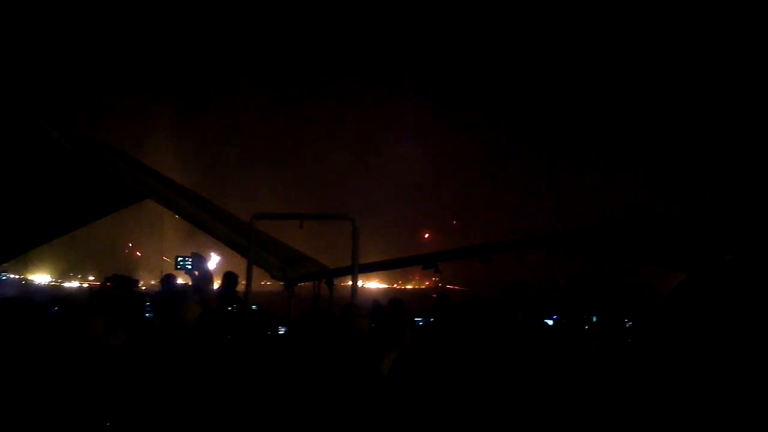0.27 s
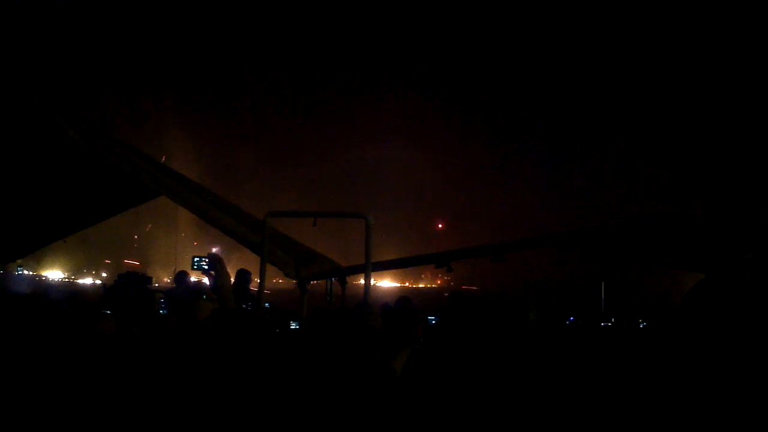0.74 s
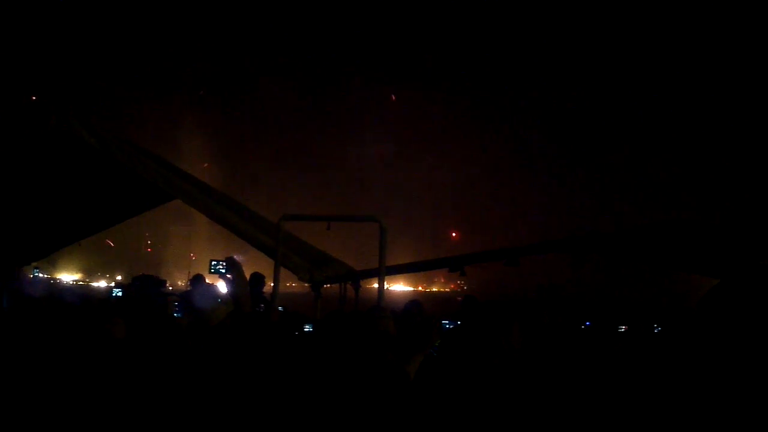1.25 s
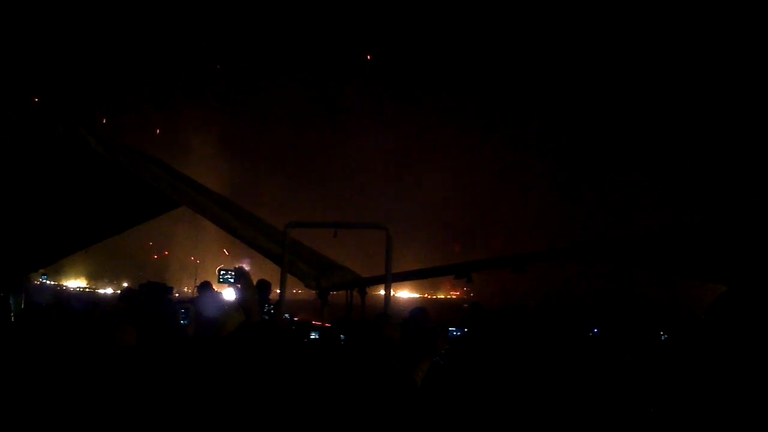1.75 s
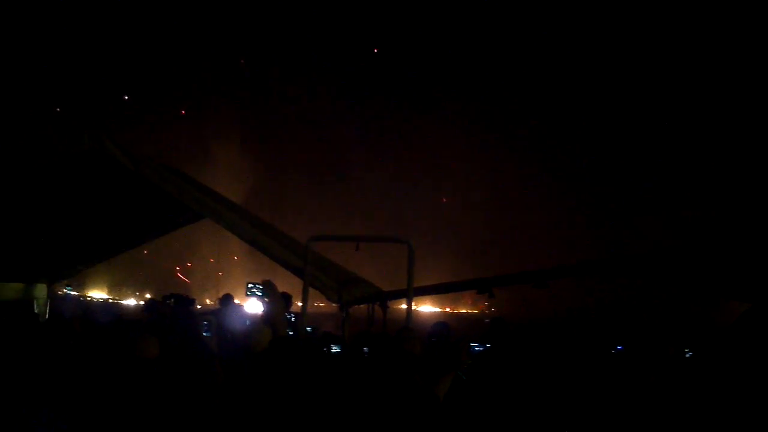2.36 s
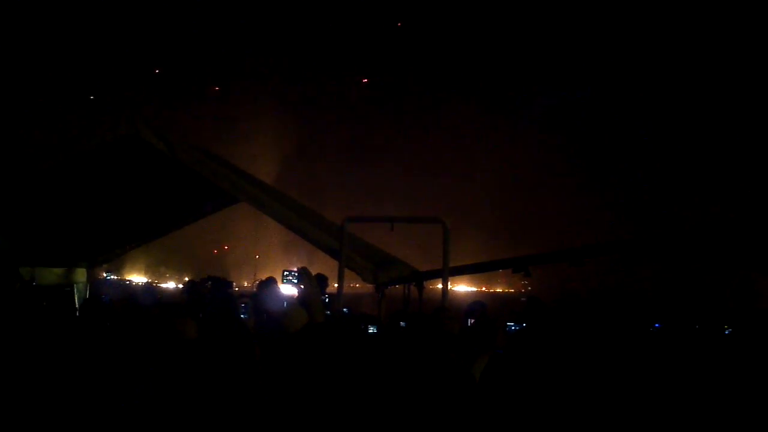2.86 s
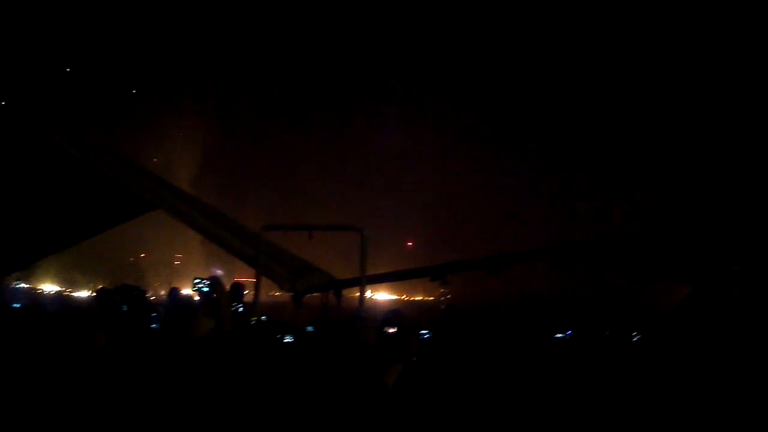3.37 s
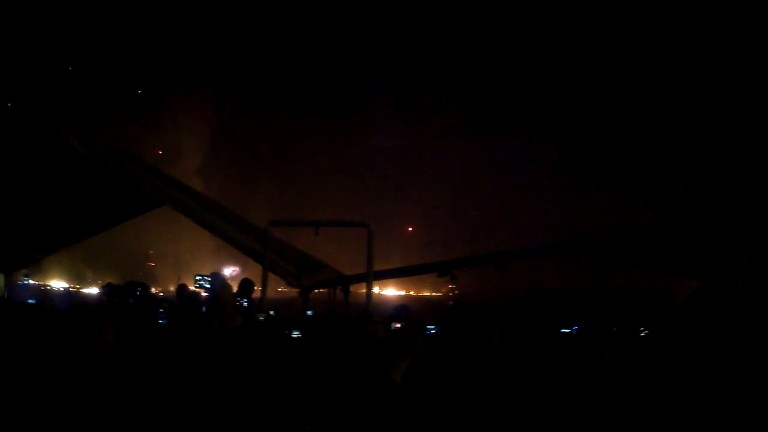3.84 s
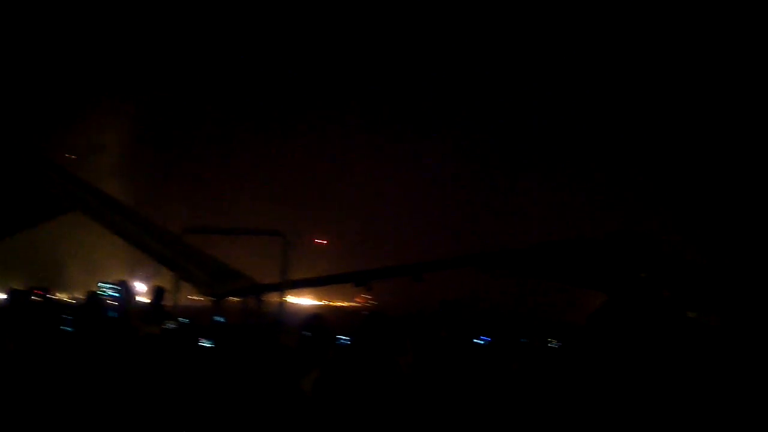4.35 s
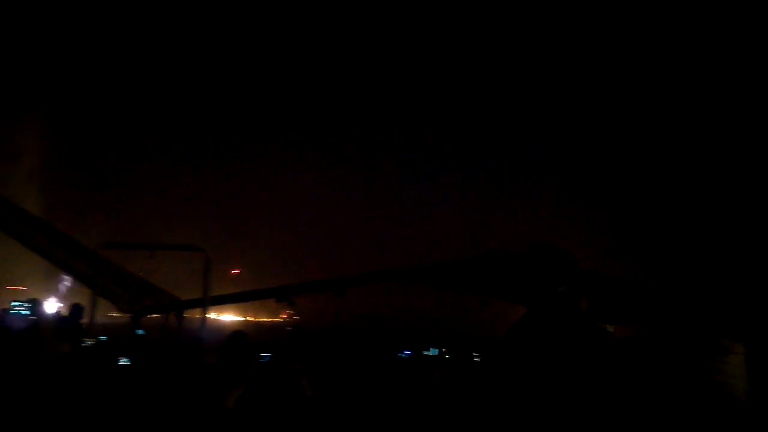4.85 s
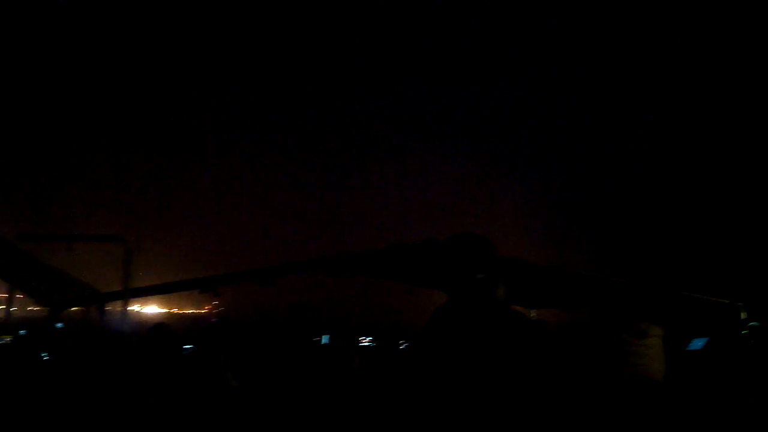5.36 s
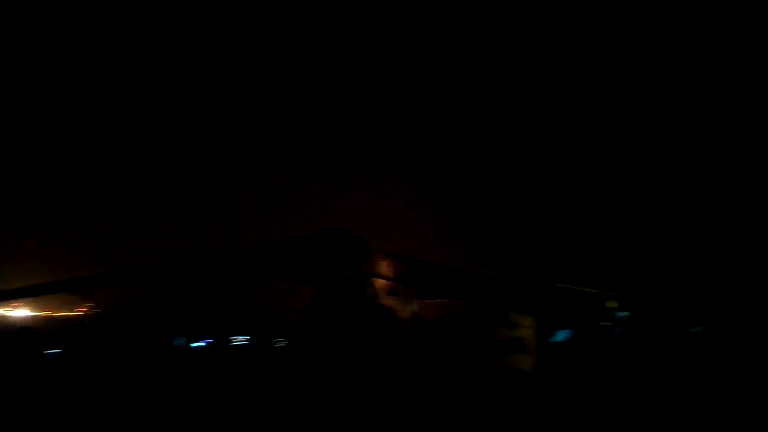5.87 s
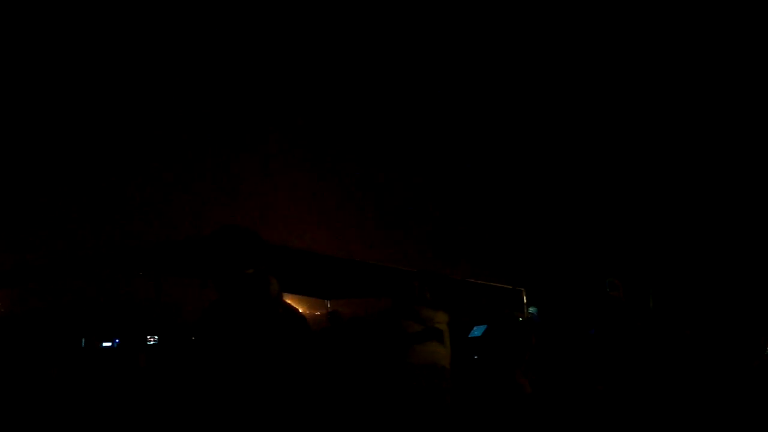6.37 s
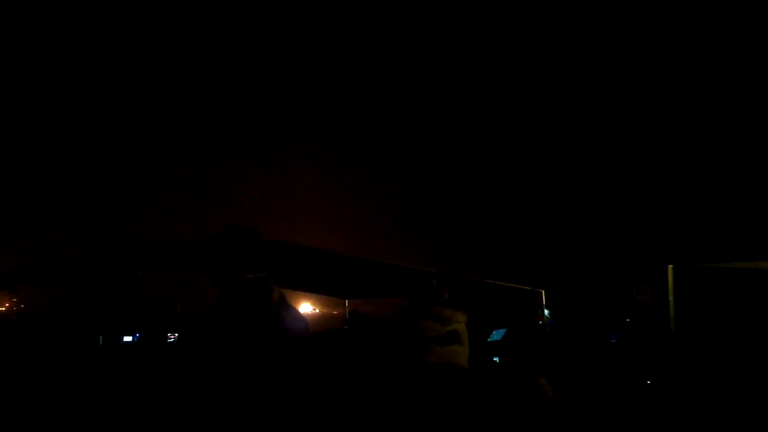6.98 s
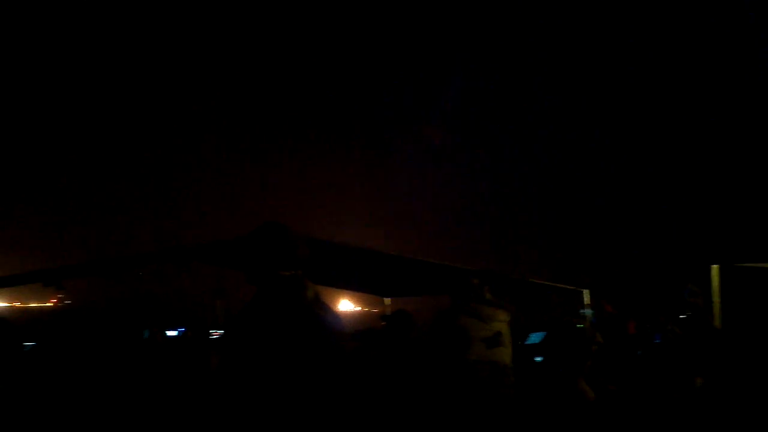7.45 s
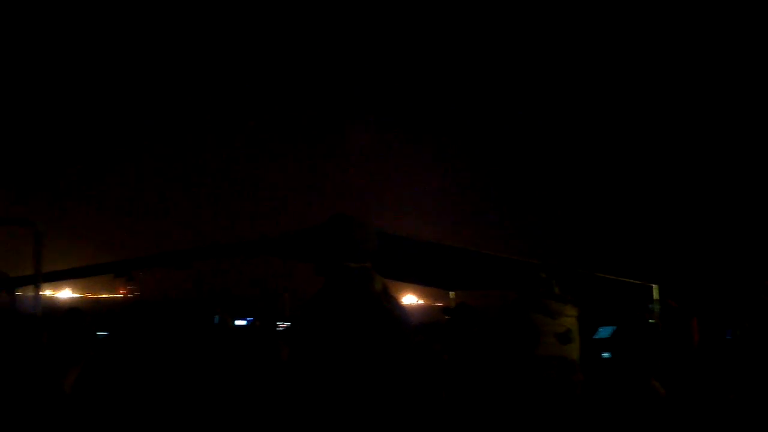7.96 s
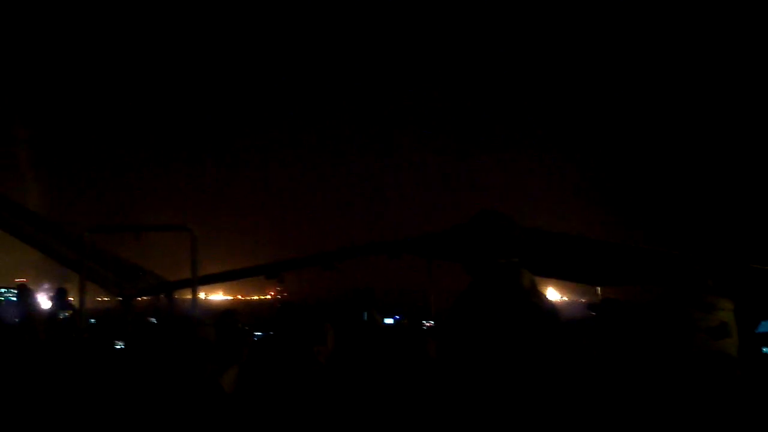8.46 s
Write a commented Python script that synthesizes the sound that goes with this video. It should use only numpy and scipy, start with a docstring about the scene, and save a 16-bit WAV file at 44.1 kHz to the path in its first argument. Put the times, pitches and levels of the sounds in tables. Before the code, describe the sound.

A near machine gun hammers about ten rounds a second without pause over a dense night firing line of slower guns, short bursts and distant rolling fire.

```python
"""A near machine gun hammers ten rounds a second over a slower gun that soon stops and short bursts along the
line. Heavy thumps come mostly from downrange, far guns blur into a roll, and a faint whine swells near the
third second. Guns are shaped pulses at listed times, with echoes, ringing structures and decaying scattered
noise. Thumps are falling sine swings; the whine is a wavering sine. A small stereo microphone widens and limits
the sum."""
import sys
import numpy as np
from scipy import signal
from scipy.fft import rfft, irfft
from scipy.io import wavfile
from scipy.ndimage import uniform_filter1d, minimum_filter1d

SR = 44100
rng = np.random.default_rng(int(sys.argv[2]) if len(sys.argv) > 2 else 0)


def file_out(sig):
    """Save sig as 16-bit WAV at sys.argv[1]."""
    # one column per channel
    cols = np.atleast_2d(sig).T
    # limit, then scale
    lim = np.clip(cols, -1, 1)
    pcm = np.round(lim * 32767).astype(np.int16)
    wavfile.write(sys.argv[1], SR, pcm)


N = 384552
TIME_S = np.arange(N) / SR
FREQS_HZ = np.fft.rfftfreq(N, 1 / SR)

# All dB levels below are relative, ahead of the mix gains.
# Far line firing. Each row: time in seconds, roll level in dB, treble level in dB.
FAR_LINE = [(0.0, -23, -45), (0.82, -23, -31), (1.7, -24, -30.5), (3.79, -27, -31.5), (4.01, -27, -40),
            (5.39, -26, -33.5), (6.63, -24.5, -32.5), (6.9, -20.5, -27.5), (7.43, -25.5, -34),
            (8.04, -25, -30), (8.43, -28, -38), (8.72, -25, -37)]
# Far line's midrange clatter. Each row: time in seconds, level in dB.
FAR_CLATTER_LEVEL = [(0.0, -28), (1.0, -33.5), (2.6, -29), (3.3, -32.5), (4.1, -34), (4.7, -42), (6.5, -48),
                     (6.95, -36), (7.3, -50), (8.72, -53)]
# Faint hoarse whine. Each row: time in seconds, centre in Hz, level in dB.
WHINE = [(2.3, 415, -50), (2.55, 400, -31.5), (2.72, 400, -32), (2.82, 423, -35), (3.15, 446, -34),
         (3.35, 447, -53)]
# Dull low reports, mostly from downrange; the low chirps near 5.27 s and 6.96 s come with near-gun rounds. #
# Each row: start in seconds, level in dB, starting pitch in Hz, final pitch in Hz, # length in seconds, left
# minus right in dB.
THUMPS = [(0.012, -17, 707, 655, 0.019, 5), (0.218, -18, 710, 653, 0.02, 0),
          (0.728, -20, 720, 660, 0.02, 1), (0.853, -13, 229, 114, 0.019, 4),
          (0.881, -19, 170, 130, 0.023, 2), (5.2415, -15.5, 307, 101, 0.017, 15),
          (5.272, -22, 238, 100, 0.018, 1), (6.705, -18, 282, 230, .02, 6), (6.84, -19, 260, 200, .02, 8),
          (6.958, -12.5, 292, 110, 0.017, 10), (6.975, -17, 300, 240, 0.017, 7),
          (7.709, -12.5, 290, 184, 0.017, -6), (7.817, -12, 287, 185, 0.017, -6),
          (7.931, -13.5, 280, 182, 0.017, -3)]
# Other guns on the line. Each row: time in seconds, midrange bark in dB, knock in Hz, treble crack in dB.
LINE_SHOTS = [(0.0, -21, 786, -22), (0.074, -18, 470, -20.5), (0.105, -17, 1210, -23.0),
              (0.188, -15.5, 470, -20.5), (0.25, -21, 1420, -31.0), (0.27, -18, 1160, -28.0),
              (0.298, -20, 1680, -23.0), (0.348, -15.5, 1030, -26), (0.407, -22, 650, -37),
              (0.433, -19, 1160, -30), (0.525, -23, 1080, -31), (0.61, -12.5, 600, -24),
              (0.681, -37, 990, -27), (0.698, -15.5, 520, -29.0), (0.727, -27, 1120, -26),
              (0.779, -16, 520, -26.0), (0.848, -17, 470, -39), (0.902, -22, 470, -25),
              (0.997, -21, 1160, -23.0), (1.089, -23, 780, -25.0), (1.181, -20, 1590, -25),
              (1.275, -23, 690, -30), (1.283, -33, 990, -35), (1.364, -23, 1380, -24.5),
              (1.478, -17.5, 1120, -23.5), (1.549, -21, 1080, -25.5), (1.576, -19, 1080, -29),
              (1.64, -21, 1340, -26.0), (1.674, -22, 990, -30), (1.828, -18, 950, -33),
              (1.918, -23, 1510, -24), (2.172, -22, 1080, -32.0), (2.268, -24, 1120, -28),
              (2.363, -22, 1080, -33), (2.38, -20, 1460, -26), (2.471, -18.5, 520, -30),
              (2.489, -28, 690, -31.0), (2.522, -22, 1210, -28), (2.537, -21, 470, -38),
              (2.566, -19, 1420, -29), (2.68, -28, 950, -28), (2.998, -24, 820, -38),
              (3.204, -21, 470, -22.5), (3.301, -25, 470, -21.5), (3.474, -18.5, 1175, -27.0),
              (3.559, -21, 1200, -30), (3.577, -23, 1080, -32), (3.675, -19.5, 1120, -35.0),
              (4.033, -20.5, 1080, -25.5), (4.056, -22, 470, -36), (4.129, -21, 1110, -26),
              (4.225, -19, 470, -27.0), (4.544, -21.5, 1410, -24.5), (4.639, -21, 1410, -25.5),
              (4.734, -18.5, 1400, -28.0), (4.827, -20, 1420, -27.5), (4.84, -16.5, 560, -36),
              (4.92, -19.5, 1380, -27), (5.241, -22, 600, -43), (5.261, -17, 1210, -29.0),
              (5.36, -19, 1160, -29), (5.467, -17.5, 1160, -29), (5.56, -16, 1080, -28.5),
              (5.653, -17.5, 1340, -28.5), (5.992, -18.5, 860, -23), (6.064, -17, 1370, -29),
              (6.1, -14, 820, -20.0), (6.167, -14, 1180, -30), (6.265, -14.5, 1170, -28),
              (6.359, -15.5, 1180, -30), (6.565, -18.5, 1980, -29), (6.704, -21, 950, -26),
              (6.742, -24, 900, -28.0), (6.764, -15.5, 1120, -32), (6.847, -23, 860, -25),
              (6.872, -14.5, 1140, -29), (6.942, -32, 690, -26), (6.965, -18, 1200, -30),
              (7.042, -29, 690, -29), (7.061, -16, 1160, -23.5), (7.142, -45, 470, -27),
              (7.477, -17.5, 1250, -29), (7.581, -16, 1220, -30.0), (7.679, -14, 1200, -32),
              (8.063, -15, 1170, -32), (8.163, -15.5, 1160, -23), (8.268, -18, 1120, -42),
              (8.36, -17.5, 1030, -30), (8.465, -15, 1210, -38), (8.645, -15, 830, -18.5)]
# Slow gun, evenly spaced between listed rounds. Each row: time in seconds, midrange bark in dB,
# treble crack in dB, knock in Hz.
SLOW_GUN = [(0.100, -16, -19.5, 1190), (0.2185, -13, -21.5, 1290), (0.332, -18, -22.5, 1380),
            (0.448, -14, -20, 1040), (0.5645, -14, -22, 1150), (0.801, -16, -20.5, 1290),
            (0.920, -17, -23, 1820), (1.036, -17, -23, 1460), (1.266, -17.5, -21, 1550),
            (1.382, -15, -20.5, 1420), (1.498, -16.5, -21.5, 1230), (1.609, -20, -20, 1200),
            (1.727, -16.5, -19.5, 1310), (1.957, -16.5, -21.5, 1320), (2.073, -20, -20, 1410),
            (2.411, -17, -22.5, 1940), (2.523, -18, -22, 1200), (2.633, -17.5, -21.5, 1270)]
# Near gun, firing without a break. Each row: time in seconds, muzzle blast in dB, midrange bark in dB,
# treble crack in dB.
NEAR_GUN = [(0.0118, 0, -17.5, -21), (0.1112, 2.5, -18, -22), (0.2117, 2, -23, -18.5),
            (0.3146, 2, -22, -19), (0.4148, -0.5, -20, -23), (0.516, -1.5, -19, -21),
            (0.6192, -2, -25.0, -22), (0.7211, -1.5, -19, -25), (0.8217, 0, -21, -24.5),
            (0.9208, 0, -21, -24), (1.0219, -3, -20, -20.5), (1.1164, -1, -30, -24),
            (1.2131, -2.5, -23, -21.5), (1.3083, -1.5, -33, -25.5), (1.4071, 0, -23, -23.5),
            (1.5063, -1, -24.0, -28), (1.6028, -2.5, -22, -27), (1.6978, 2, -24, -23.5),
            (1.7941, -1, -26, -24.5), (1.89, -1, -24, -24), (1.9867, 2, -19, -20), (2.0866, 0.5, -18, -22),
            (2.1857, 2.5, -20, -21), (2.2883, -1.5, -21, -23), (2.3856, 0.5, -22, -22.0),
            (2.4833, -2, -17.5, -22.5), (2.578, -1.5, -20.5, -22), (2.6783, 1.5, -18.5, -25),
            (2.7766, 0.5, -21, -23.5), (2.8763, 1.5, -22, -24), (2.9774, 1, -23, -24),
            (3.0813, -4, -21, -24.5), (3.1741, 2.5, -18.5, -22.5), (3.2681, 2.5, -19, -23),
            (3.3731, -1, -19.5, -24), (3.4701, -1, -19, -23), (3.5707, 0.5, -22, -22),
            (3.6674, 2, -26, -21), (3.7722, 0, -27, -23), (3.8699, 1, -26, -22.5),
            (3.9666, 0.5, -23, -21.5), (4.0674, -0.5, -19, -22), (4.1663, 0.5, -21, -21),
            (4.2643, -1, -20, -23.5), (4.3609, 2.5, -18.5, -21), (4.463, 0.5, -21.5, -22.5),
            (4.561, 0, -23.5, -24), (4.6596, -1.5, -22, -23), (4.7615, -0.5, -19.5, -24),
            (4.8641, 1, -20, -23.5), (4.9611, -1, -19.5, -23.0), (5.0696, 3, -21.0, -21.5),
            (5.167, -1, -19, -23.5), (5.2705, -1.5, -25.5, -25.5), (5.369, -0.5, -20, -24.5),
            (5.4732, 1, -23, -24.5), (5.5738, -1.5, -22.5, -24), (5.6773, -2, -20, -24.0),
            (5.7743, -1.5, -19.5, -23.0), (5.8796, -1.5, -18.5, -25.5), (5.978, -1, -20, -22.5),
            (6.0822, 0.0, -20, -24), (6.1794, -1.5, -24.0, -23), (6.2802, -2, -20.5, -24),
            (6.3831, -2.5, -18.5, -23.5), (6.487, -2, -21.5, -23.0), (6.5864, 0, -20, -24.5),
            (6.6842, 1.0, -18, -24), (6.783, -2, -22.0, -22.5), (6.8816, -2, -22, -26.5),
            (6.9787, 0.5, -33, -23.5), (7.0766, 0.5, -23.0, -24.5), (7.1749, -1, -24.5, -25.5),
            (7.2729, -2.5, -19, -24.5), (7.3681, 0, -20, -25.5), (7.463, -0.5, -21, -25),
            (7.5606, -1, -22, -26), (7.6595, -2.5, -27, -25.5), (7.7569, -2.5, -22.5, -25.0),
            (7.8603, -3.5, -17.5, -24), (7.9595, -1.5, -19, -26.5), (8.0635, -5, -17.5, -26),
            (8.1617, -0.5, -17, -28), (8.2652, 0, -20, -24), (8.3648, -2.5, -19, -24),
            (8.4661, -1.0, -20.5, -24), (8.5663, -1, -21, -22.5), (8.6661, 3, -19, -19)]
# Paths from the near gun. Each row: delay in milliseconds, level in dB.
PATHS = [(.9, -11.5), (1.8, -5.5), (2.3, -3), (4.8, -21.5), (5.6, -15.5), (6.6, -13.5), (10.9, -14),
         (14.3, -23.5), (21.8, -30.5), (35.4, -26), (40.5, -16), (41.5, -20.5)]
# Nearby structures that ring after every near blast. Each row: mode in Hz, level in dB, t60 in seconds.
RING = [(93, -11.5, 0.26), (115.3, -8.5, 0.24), (138.3, -2.5, 0.31), (225, -19, 0.28), (256.8, -8.5, 0.25),
        (346, -19, 0.66), (412, -15, 0.18), (515.6, -18, 0.36), (621.6, -4, 0.082), (677, -18.5, 0.13),
        (821.6, -6.5, 0.32), (1004, -36, 0.22)]

# Pulse spectra. Each row: frequency in Hz, density in relative dB per Hz.
# Far guns' merged roll.
ROLL_SPECTRUM = [(25, -48), (45, -38), (62, -20), (95, -4.5), (135, 2.5), (165, -1.5), (257, 4.5),
                 (500, -1), (1030, -5), (1450, -8.5), (1900, -13.5), (2850, -9.5), (8000, -36),
                 (15000, -75)]
# Far midrange clatter.
CLATTER_SPECTRUM = [(100, -33.5), (350, -4.5), (600, 0.5), (880, 2.5), (1150, -5.5), (1600, -21.5), (8000, -56)]
# Near muzzle blast.
BLAST_SPECTRUM = [(30, -50.5), (60, -12), (90, 2), (130, -17.5), (165, -3.5), (250, 4), (450, -0.5),
                  (700, -6), (1050, -3.5), (1500, -38), (3000, -42.5), (16000, -54)]
# Midrange bark.
BARK_SPECTRUM = [(40, -36), (200, -12.5), (450, -5), (800, -2.5), (1200, 0), (1500, -12.5), (1900, -10.5),
                 (3200, -14), (6000, -59), (16000, -15.5)]
# Treble crack.
CRACK_SPECTRUM = [(40, -49), (200, 6.5), (1000, -12.5), (2200, 3.5), (3500, -1.5), (5500, -6), (8200, 1.5),
                  (10000, -1.5), (12500, -7.5), (16000, -12.5)]
# Hard first knock of the slow gun.
SLOW_KNOCK_SPECTRUM = [(40, -56), (200, -2), (500, 11.5), (850, 6), (1200, -1), (1600, -2.5), (2100, -8),
                       (3200, -21), (6000, -23), (16000, -12)]
# Hard first knock of the other guns on the line.
LINE_KNOCK_SPECTRUM = [(40, -78), (200, -7), (500, 9), (850, -1), (1200, 1.5), (1500, -3), (1900, -9),
                       (3200, -8), (6000, -41), (16000, -4.5)]

# Phase between microphone ports. Each row: frequency in Hz, left lead in radians before crossfeed.
PORT_PHASE = [(40, 4), (100, 2), (170, 1.27), (250, 1.48), (400, 0.08), (650, 1.03), (1000, 0.5)]
# Level between microphone ports. Each row: frequency in Hz, left minus right gain in dB.
PORT_BALANCE = [(60, 5), (130, -6), (250, 1.5), (450, 2), (680, 1.5), (1000, 1), (1400, -1), (1850, 7.5),
                (2500, -0.5)]

FAR_ROLL_DB, FAR_HISS_DB = -2, -5.5
SLOW_PERIOD_S = 0.115
BLAST_VARY_DB, BARK_VARY_DB, CRACK_VARY_DB = 0.5, 0.5, 0.72  # standard deviation between rounds
PATH_VARY_DB = 0.5  # smoke and hot air unsettle each path
KNOCK_PEAK_DB, KNOCK_WIDTH_OCT = 10.5, 0.23  # resonance of each knock
SLAP_S, SLAP_DB = 0.034, -14.5  # a hard surface throws the near gun's crack back
CROSSFEED_SAMPLES = 15
LIMITER_DB, LIMITER_RELEASE_S = -5, 0.042
BOTTOM_HZ, TOP_HZ = 67, 15800


def undb(db):
    """Decibels to amplitude gain."""
    return 10 ** (np.asarray(db) / 20)


def along(points, hz):
    """Read (Hz, value) points on a log-frequency axis."""
    points_hz, value = np.transpose(points)
    return np.interp(np.log(hz + 1), np.log(points_hz), value)


def convolve(x, response):
    """Pass each channel through a response."""
    return signal.fftconvolve(np.atleast_2d(x), np.atleast_2d(response), axes=-1)[:, :N]


def lowpass(x, hz):
    """Second-order treble loss, as air dulls what travels far."""
    return signal.sosfilt(signal.butter(2, hz, fs=SR, output="sos"), x)


def pan(db):
    """Left and right gains for a left-minus-right level."""
    return undb(np.array([[db], [-db]]) / 2)


def pulse(spectrum, size=4096):
    """Causal minimum-phase pressure pulse of unit energy with this spectrum; its lows come late."""
    log_magnitude = np.log(undb(along(spectrum, np.fft.rfftfreq(size, 1 / SR))))
    cepstrum = irfft(log_magnitude)
    # Folding the cepstrum forward in time makes the pulse causal.
    cepstrum[1:size // 2] *= 2
    cepstrum[size // 2 + 1:] = 0
    wave = irfft(np.exp(rfft(cepstrum)))
    return wave / np.sqrt(np.sum(wave ** 2))


def strikes(times_s, sizes):
    """One impulse for each round."""
    samples = np.maximum(np.asarray(times_s) * SR, 0).astype(int)
    return np.bincount(samples, sizes, N)[:N]


def vary(rounds, spread_db):
    """Scatter the loudness of rounds; return the times, then each column of levels."""
    levels_db = rounds[:, 1:] + rng.standard_normal((len(rounds), len(spread_db))) * spread_db
    return rounds[:, 0], *levels_db.T


def scatter(likeness, grain_db):
    """Dense reflections of uneven size, partly shared by both ports; rms 1."""
    noise = rng.standard_normal((3, N))
    grains = undb(grain_db * np.repeat(rng.standard_normal(N // 32 + 1), 32)[:N])
    field = (np.sqrt(likeness) * noise[0] + np.sqrt(1 - likeness) * noise[1:]) * grains
    return field / field.std()


def ringing(times_s, db, early_s, late_s, late_db):
    """Scatter amplitude after rounds: energy decays fast from near objects, slowly from the range."""
    t = TIME_S[:SR // 2]
    decay = np.exp(-t / early_s) + undb(late_db) ** 2 * np.exp(-t / late_s)
    energy = convolve(strikes(times_s, undb(db) ** 2), decay)
    return np.sqrt(np.abs(energy))


def far_guns(count=36, size=12):
    """Bursts from far guns, each at its own rate and bearing, over their merged echoes and a bright hiss."""
    s, level_db, treble_db = np.transpose(FAR_LINE)
    rounds = 0
    for start, rate, bearing in rng.random((count, 3)):
        start_s = start * (TIME_S[-1] + 1) - 1
        times_s = start_s + np.arange(size) / (8 + 6 * rate)  # 8 to 14 rounds a second
        sizes = undb(2 * rng.standard_normal(size)) * (times_s > 0)
        rounds = rounds + strikes(times_s, sizes) * pan(db=45.0 * (bearing - 0.5))
    field = undb(-8.0) * rounds / rounds.std() + scatter(likeness=0.49, grain_db=0.5)
    roll = lowpass(lowpass(convolve(field, pulse(ROLL_SPECTRUM)), hz=2310), hz=6800)
    hiss = lowpass(convolve(scatter(likeness=0.018, grain_db=-4.5), pulse(CRACK_SPECTRUM)), hz=8160)
    roll_gain = undb(np.interp(TIME_S, s, level_db) + FAR_ROLL_DB)
    hiss_gain = undb(np.interp(TIME_S, s, treble_db) + FAR_HISS_DB)
    return roll * roll_gain + hiss * hiss_gain


def far_clatter(count=520):
    """Many distant reports, thinned to midrange taps, each with a short scattered tail."""
    when, strength, bearing = rng.random((count, 3)).T
    t, db = when * TIME_S[-1], 12 * strength
    taps = np.array([strikes(t, undb(db + side * 6.5 * (bearing - 0.5))) for side in (1, -1)])
    tail_level = ringing(t, db - 23, early_s=0.0059, late_s=0.033, late_db=-10.5)
    field = taps + tail_level * scatter(likeness=0.72, grain_db=-0.5)
    heard = convolve(field, pulse(CLATTER_SPECTRUM))
    level_db = np.interp(TIME_S, *np.transpose(FAR_CLATTER_LEVEL))
    return heard / heard.std() * undb(level_db)


def whine(waver_hz=16, waver=0.018, flutter_db=3):
    """One thin gliding tone; slow noise wavers its pitch (rms fraction) and its strength (rms dB)."""
    s, hz, db = np.transpose(WHINE)
    drift = lowpass(rng.standard_normal((2, N)), waver_hz)
    bend, flutter = drift / drift.std()
    pitch_hz = np.interp(TIME_S, s, hz) * (1 + waver * bend)
    phase = 2 * np.pi * np.cumsum(pitch_hz) / SR
    level = np.interp(TIME_S, s, undb(db), left=0, right=0)
    return np.sin(phase) * undb(flutter_db * flutter) * level


def thumps():
    """Dull low reports: a few swings that sink in pitch as the lows arrive late, then a faint rumble."""
    out = np.zeros((2, N))
    t = TIME_S[:SR // 6]
    for s, db, start_hz, end_hz, length_s, side_db in THUMPS:
        u = np.arange(int(length_s * SR)) / (length_s * SR)
        phase = 2 * np.pi * np.cumsum(start_hz * (end_hz / start_hz) ** u) / SR
        overtone = undb(-10) * (1 - u) * np.sin(2.6 * phase)
        swing = -(np.sin(phase) + overtone) * np.sin(np.pi * u) ** 0.78 * undb(db)
        direct = (t == 0) * pan(db=side_db)
        rumble = undb(-47) * np.exp(-t / 0.027) * rng.standard_normal((2, len(t)))
        heard = signal.fftconvolve(swing[None], direct + rumble, axes=-1)
        start = max(int(s * SR), 0)
        out[:, start:start + heard.shape[1]] += heard
    return out


def shock(times_s, db, length_s):
    """The N-shaped front of a report: two abrupt pressure jumps with a straight ramp between."""
    return convolve(strikes(times_s, undb(db)), np.linspace(-1, 1, int(length_s * SR) + 2))


def cracks(times_s, db, snap_db):
    """The treble of each round: a snap, bright scatter from nearby, then a duller tail from the range."""
    snap = strikes(times_s + 0.0012, undb(db + snap_db)) * pan(db=20)
    close_level = ringing(times_s, db + 0.5, early_s=0.005, late_s=0.014, late_db=-4.0)
    close = close_level * scatter(likeness=0.0035, grain_db=2.0)
    tail_level = ringing(times_s + 0.0018, db - 7.5, early_s=0.025, late_s=0.067, late_db=-14.0)
    tail = tail_level * scatter(likeness=0.0081, grain_db=2.5)
    return undb(-2.0) * convolve(snap + close + lowpass(tail, hz=9200), pulse(CRACK_SPECTRUM))


def knocks(times_s, db, centres_hz, spectrum, bounce_db):
    """A compact knock with its own resonance for each round, followed by its bounce off the ground."""
    out = np.zeros(N + SR)
    grid_hz = np.geomspace(40, 16000, num=60)
    bounces_s = rng.uniform(0.0008, 0.002335, len(times_s))
    for s, level_db, hz, bounce_s in zip(times_s, db, centres_hz, bounces_s):
        octaves = np.log2(grid_hz / hz)
        peak_db = KNOCK_PEAK_DB * np.exp(-0.5 * (octaves / KNOCK_WIDTH_OCT) ** 2)
        shape = np.transpose([grid_hz, along(spectrum, grid_hz) + peak_db])
        wave = undb(level_db) * pulse(shape, size=1024)
        for at_s, gain in ((s, 1), (s + bounce_s, undb(bounce_db))):
            start = max(int(at_s * SR), 0)
            out[start:start + len(wave)] += gain * wave
    return out[:N]


def reports(rounds, knock_spectrum, knock_db, bounce_db, scatter_db):
    """Sharper, lighter reports: a shock front, a hard knock and its bounce, then scatter and crack."""
    t, bark_db, crack_db = vary(rounds[:, :3], [BARK_VARY_DB, CRACK_VARY_DB])
    knock = knocks(t + 0.001216, bark_db + knock_db, rounds[:, 3], knock_spectrum, bounce_db)
    bark_level = ringing(t + 0.0025, bark_db + scatter_db, early_s=0.007, late_s=0.036, late_db=-26.0)
    bark = bark_level * scatter(likeness=0.69, grain_db=0.0)
    front = shock(t + 0.000932, bark_db - 3.0, length_s=0.0005)
    body = lowpass(front + knock + convolve(bark, pulse(BARK_SPECTRUM)), hz=6700)
    return body + cracks(t, crack_db, snap_db=12.0)


def sustained_fire(course, period_s):
    """Rounds of a long burst, evenly spaced from point to point while the other columns glide."""
    course = np.array(course)
    steps = np.round(np.diff(course[:, 0]) / period_s)
    fired = np.append(0, np.cumsum(steps))
    count = np.arange(fired[-1] + 1)
    return np.transpose([np.interp(count, fired, column) for column in course.T])


def line_guns():
    """The slow gun fires one long burst with mostly stronger cracks; the others, short bursts and single rounds."""
    slow_rounds = sustained_fire(SLOW_GUN, SLOW_PERIOD_S)
    slow = reports(slow_rounds, SLOW_KNOCK_SPECTRUM, knock_db=21.5, bounce_db=-5.0, scatter_db=-7)
    line_rounds = np.array(LINE_SHOTS)[:, [0, 1, 3, 2]]  # columns into the slow gun's order
    return slow + reports(line_rounds, LINE_KNOCK_SPECTRUM, knock_db=22.0, bounce_db=-6, scatter_db=-6.0)


def ring(x):
    """Nearby structures: decaying resonances driven by the blasts."""
    t = TIME_S[:SR // 3]
    response = 0
    for hz, db, t60_s in RING:
        mode = np.sin(2 * np.pi * hz * t) * np.exp(-np.log(1000) * t / t60_s)
        norm = np.sqrt(t60_s * SR / 4 / np.log(1000))  # about unit energy
        response = response + undb(db) * mode / norm
    return convolve(x, response)


def reflectors(decay_s, count=160):
    """Many small echoes off things that stand still, the same after every round; unit energy."""
    delay_s = rng.random(count) * decay_s * 4
    left, right = rng.standard_normal((2, count))
    fade = np.exp(-delay_s / decay_s)
    response = np.array([strikes(delay_s, size * fade) for size in (left, left + right)])[:, :SR // 2]
    return response / np.sqrt(np.sum(response ** 2, axis=1, keepdims=True))


def near_gun():
    """Every blast shares paths, reflectors and ringing structures; path levels and scatter vary by round."""
    t, blast_db, bark_db, crack_db = vary(np.array(NEAR_GUN), [BLAST_VARY_DB, BARK_VARY_DB, CRACK_VARY_DB])

    flutter_db = PATH_VARY_DB * rng.standard_normal((len(PATHS), len(t)))
    arrivals = sum(strikes(t + ms / 1000, undb(blast_db + db + flutter))
                   for (ms, db), flutter in zip(PATHS, flutter_db))
    spread_level = ringing(t + 0.0038, blast_db, early_s=0.0047, late_s=0.03, late_db=-6.5)
    spread = spread_level * scatter(likeness=0.23, grain_db=2.5)
    echoes = convolve(strikes(t + 0.012, undb(blast_db)), reflectors(decay_s=0.035))
    blast_drive = undb(10.0) * arrivals + undb(-25.5) * spread + undb(-0.5) * echoes
    blast = convolve(blast_drive, pulse(BLAST_SPECTRUM)) + undb(1.5) * ring(arrivals)

    bark_front = sum(strikes(t + ms / 1000, undb(bark_db + db + 11.5)) for ms, db in PATHS)
    bark_level = ringing(t + 0.00083, bark_db - 2.5, early_s=0.0083, late_s=0.048, late_db=-8.5)
    bark_scatter = bark_level * scatter(likeness=0.99, grain_db=-2.5)
    bark = convolve(bark_front + bark_scatter, pulse(BARK_SPECTRUM))

    shock_front = shock(t + 0.0001, bark_db + 1, length_s=0.001176)
    body = (blast + shock_front) * pan(db=9.5) + bark
    crack_times_s = np.append(t, t + SLAP_S)
    crack_levels_db = np.append(crack_db, crack_db + SLAP_DB)
    return lowpass(body, hz=6400) + cracks(crack_times_s, crack_levels_db, snap_db=9.0)


def scene():
    """All the guns, the thumps and the whine together."""
    return far_guns() + far_clatter() + whine() + thumps() + line_guns() + near_gun()


def widen(x, cross_hz, depth, shared_hz):
    """Stereo widening: the lows part in phase; above them each side subtracts the delayed other side."""
    ports = rfft(x)
    shared = 1 / (1 + (FREQS_HZ / shared_hz) ** 2)  # long waves reach both ports alike
    ports = ports + shared * (ports.mean(axis=0) - ports)
    turn = along(PORT_PHASE, FREQS_HZ)
    ports = ports * np.exp(1j * np.array([0 * turn, -turn]))
    feed = depth / (1 + (cross_hz / (FREQS_HZ + 1)) ** 6)
    delay = np.exp(-2j * np.pi * FREQS_HZ * CROSSFEED_SAMPLES / SR)
    balance = undb(np.array([[1], [-1]]) * along(PORT_BALANCE, FREQS_HZ) / 2)
    return irfft((ports - feed * delay * ports[::-1]) * balance, N)


def limit(x):
    """A limiter shared by both channels ducks everything at and just after the loudest reports."""
    fall = TIME_S / LIMITER_RELEASE_S
    level = np.abs(uniform_filter1d(np.abs(x).max(axis=0), size=24))
    # Hold each peak, then let it decay exponentially.
    peak = np.exp(np.maximum.accumulate(np.log(level + 1e-9) + fall) - fall)
    gain = np.minimum(1, undb(LIMITER_DB) / peak)
    return x * uniform_filter1d(minimum_filter1d(gain, size=32), size=32)


def record(dry):
    """The microphone inverts the pressure, widens the image, limits the peaks and cuts both spectrum ends."""
    held = limit(widen(-dry, cross_hz=1626, depth=1.0, shared_hz=137))
    held = signal.sosfilt(signal.butter(5, BOTTOM_HZ, "high", fs=SR, output="sos"), held)
    top_cut = signal.ellip(10, 0.2, 80, TOP_HZ, fs=SR, output="sos")
    return signal.sosfilt(top_cut, np.clip(held, -1, 1))


dry = scene()
out = record(dry)
file_out(out)
```